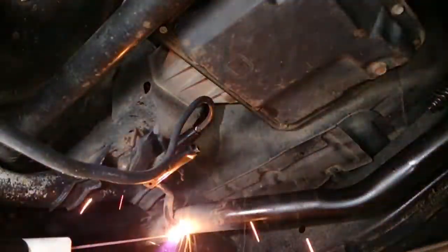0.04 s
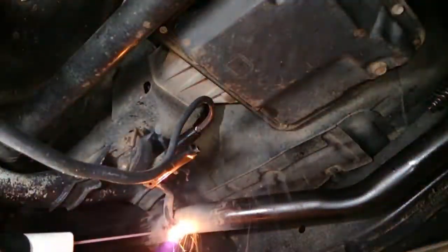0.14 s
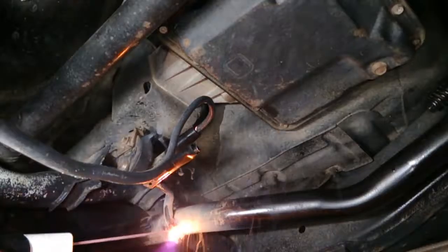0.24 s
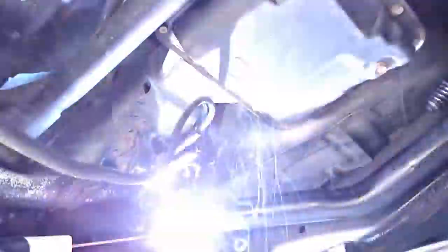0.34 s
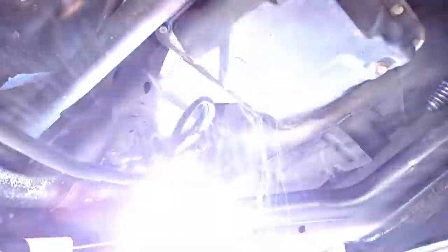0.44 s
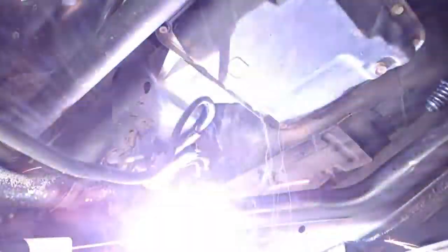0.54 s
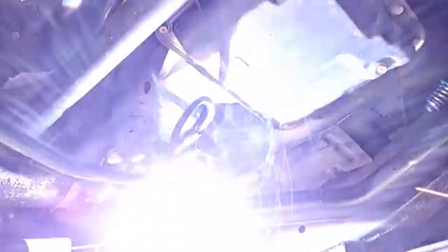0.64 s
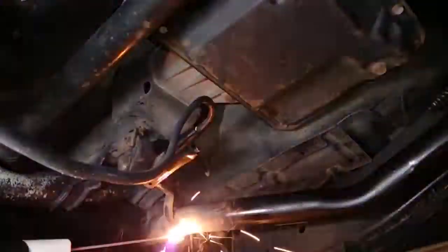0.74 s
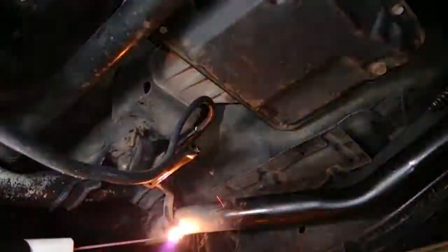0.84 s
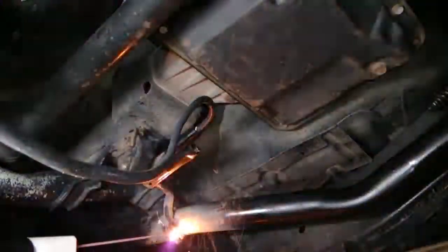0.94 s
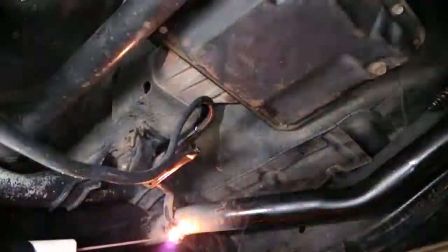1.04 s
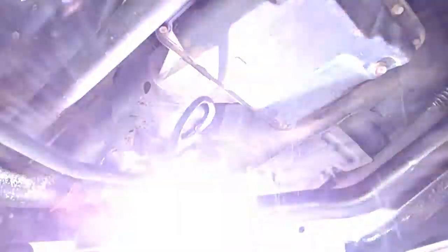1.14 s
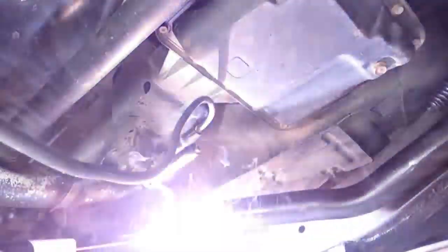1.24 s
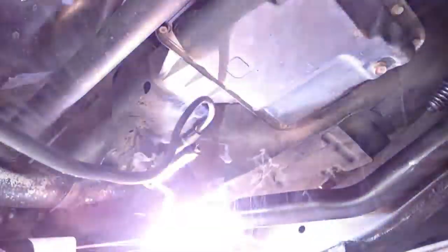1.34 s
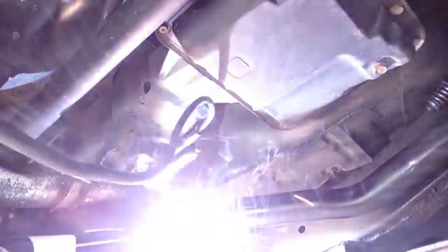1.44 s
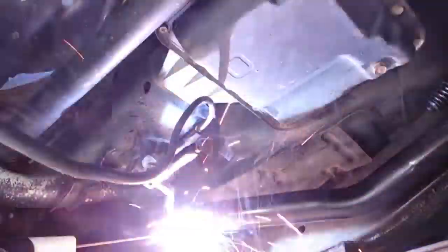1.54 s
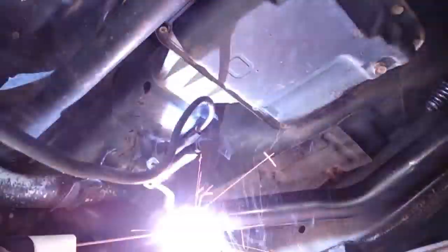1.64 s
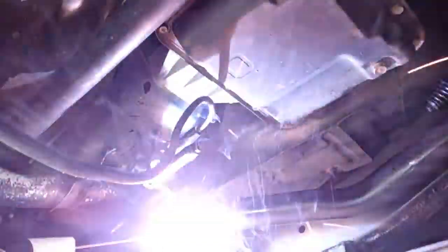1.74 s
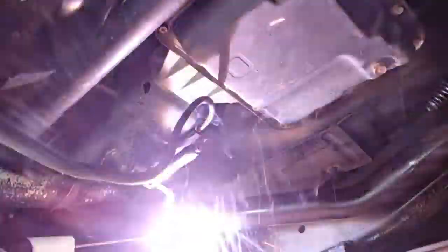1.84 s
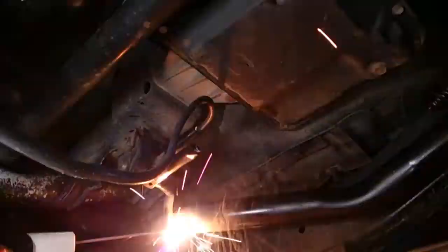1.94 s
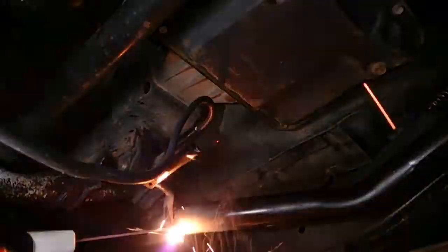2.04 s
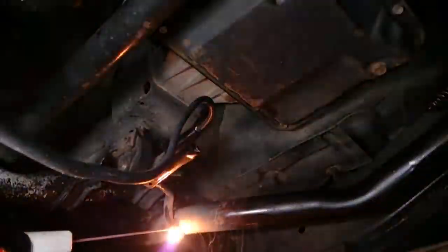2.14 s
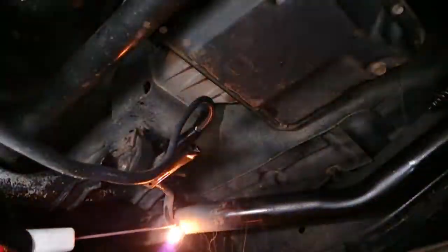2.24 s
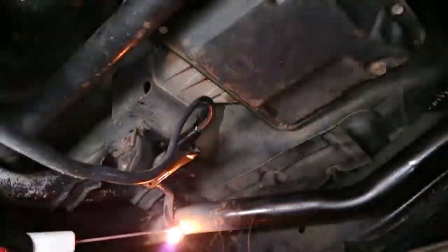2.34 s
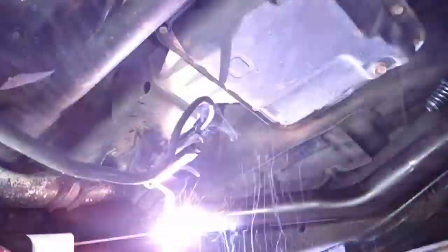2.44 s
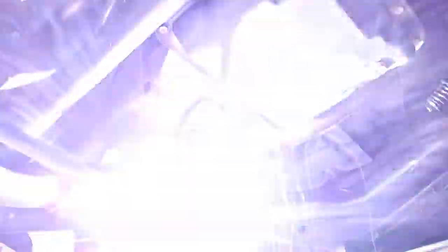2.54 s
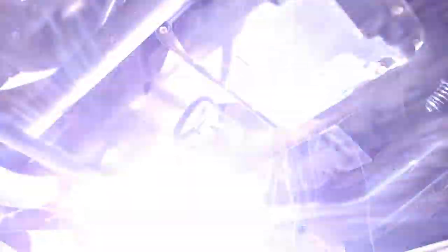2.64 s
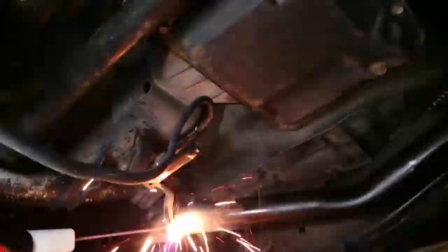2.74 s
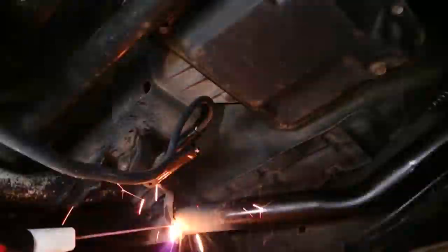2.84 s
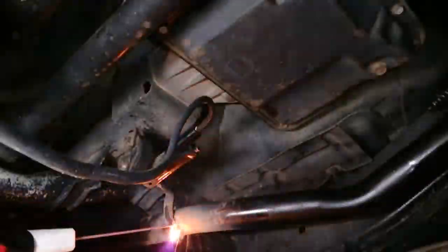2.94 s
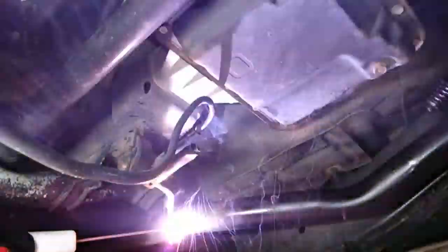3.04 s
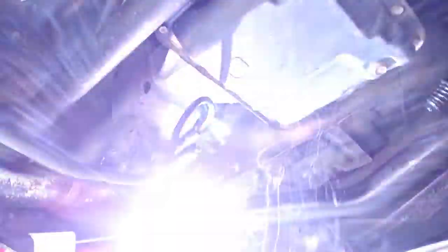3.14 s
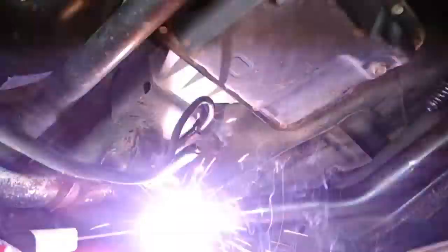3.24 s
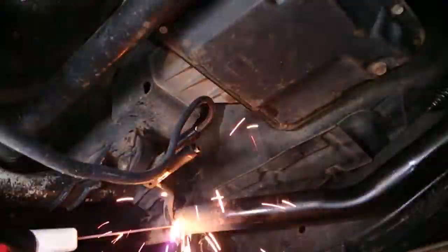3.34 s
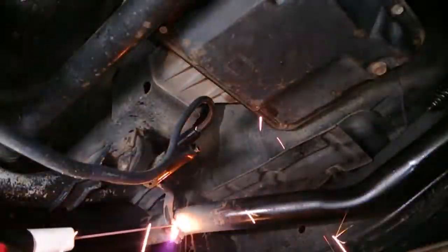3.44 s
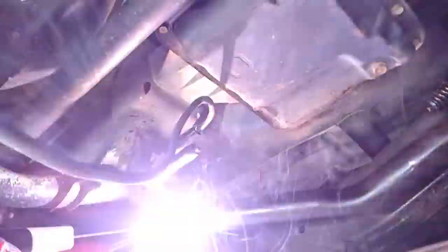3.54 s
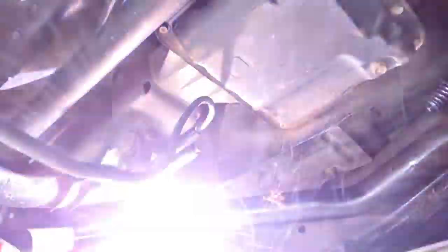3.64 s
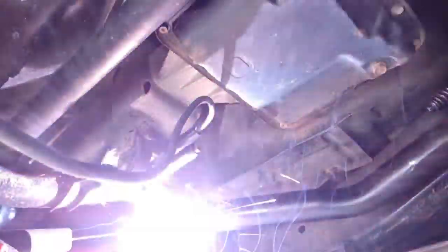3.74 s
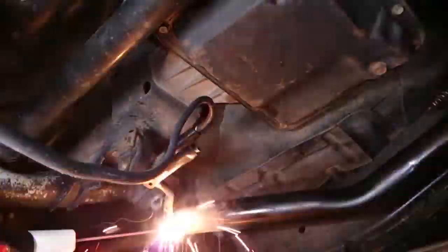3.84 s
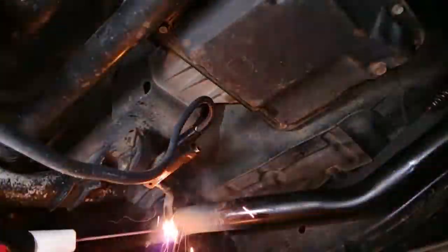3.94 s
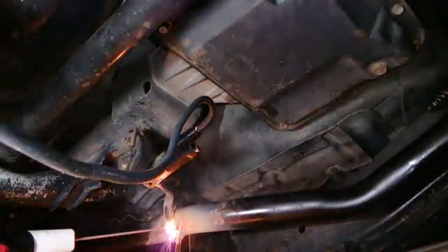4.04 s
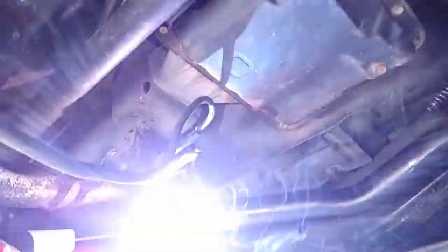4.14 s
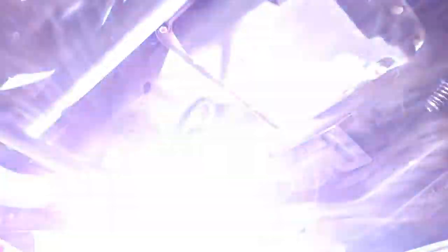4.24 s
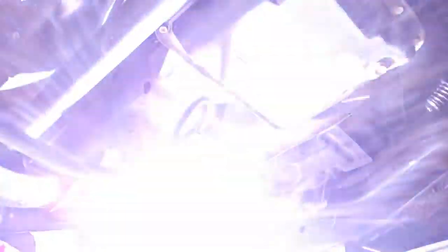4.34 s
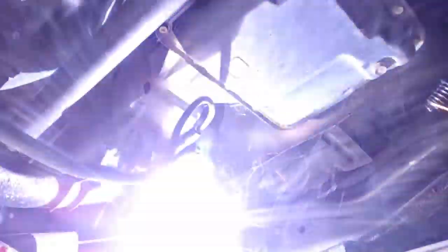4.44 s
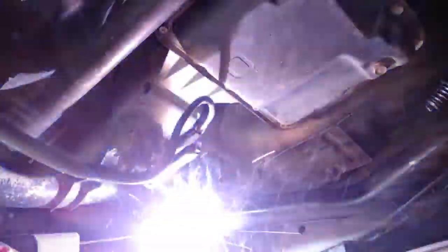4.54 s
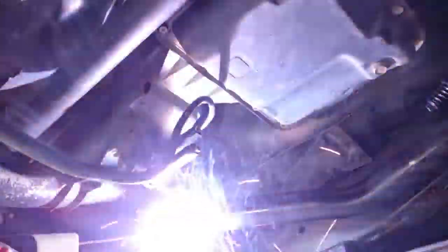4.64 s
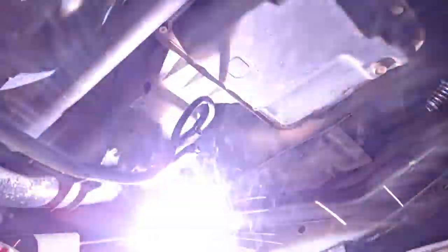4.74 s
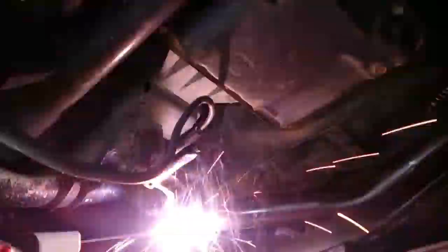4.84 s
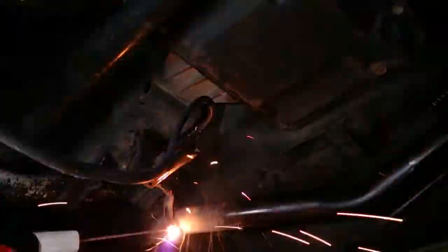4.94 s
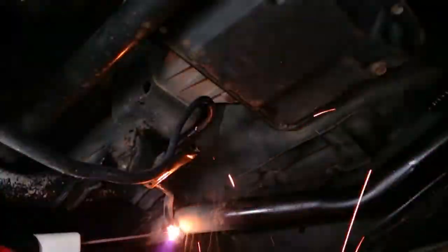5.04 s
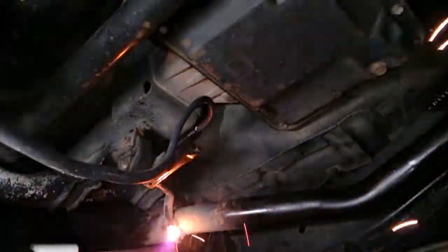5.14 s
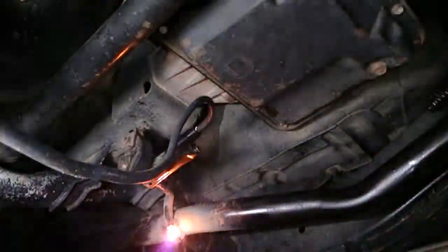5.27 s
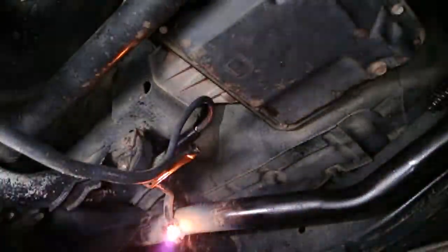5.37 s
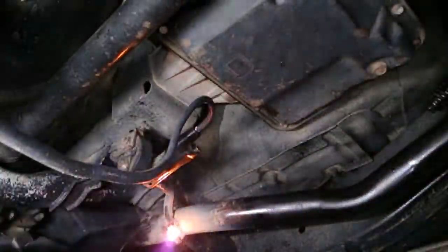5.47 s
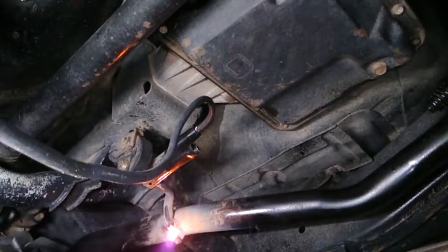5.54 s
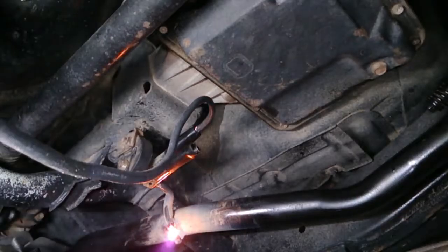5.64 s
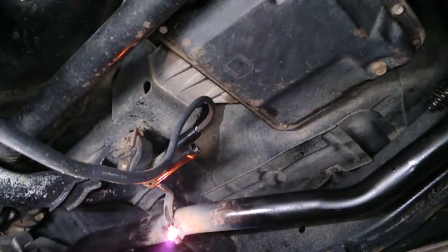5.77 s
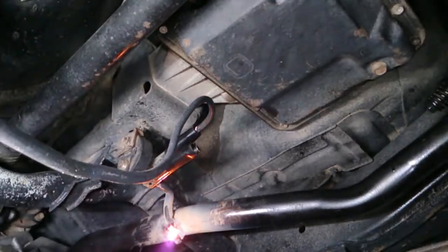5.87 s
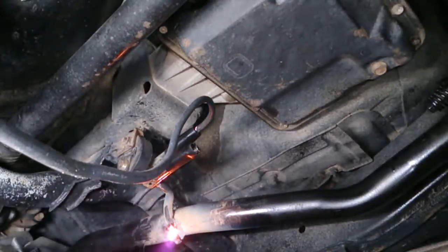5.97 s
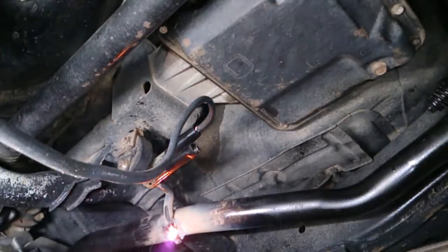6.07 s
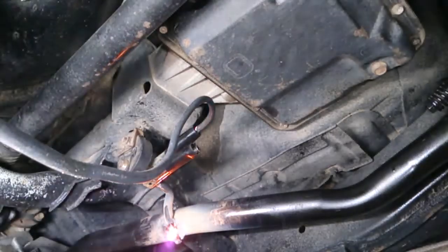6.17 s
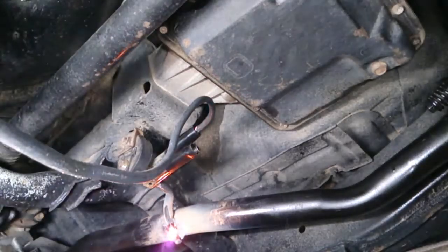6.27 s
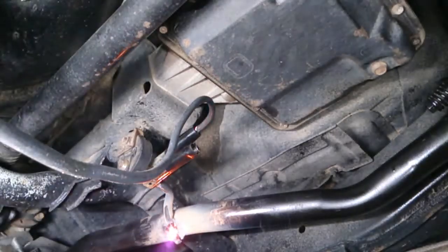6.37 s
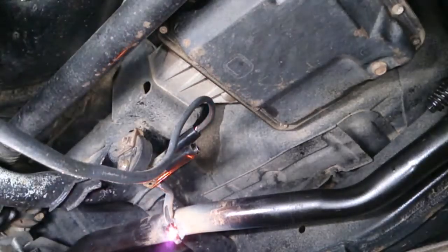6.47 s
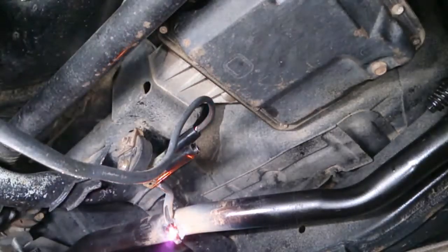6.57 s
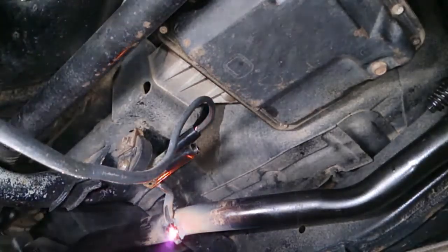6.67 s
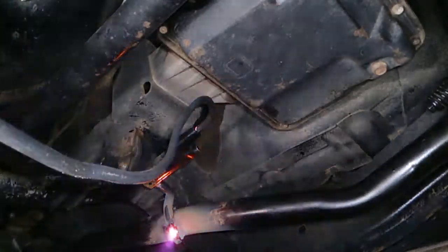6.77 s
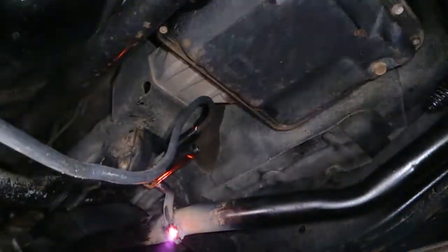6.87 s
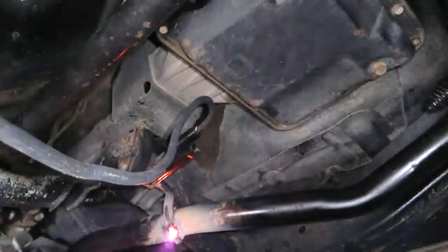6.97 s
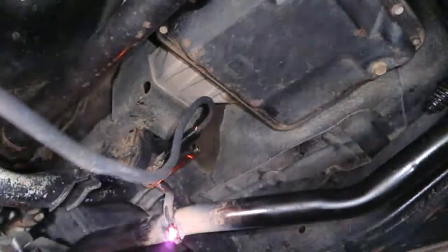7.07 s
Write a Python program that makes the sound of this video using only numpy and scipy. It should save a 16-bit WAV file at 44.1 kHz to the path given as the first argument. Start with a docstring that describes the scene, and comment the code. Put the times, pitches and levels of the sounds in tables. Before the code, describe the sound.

Sharp arc strikes spit and pop in ragged runs on an exhaust pipe, mains hum beneath, ending in quiet handling noises and fan hum.

```python
"""Under a car, a two-port microphone hears the welder's fan drone and a last scrap of arc as stick welding begins.
Six more short runs on the exhaust pipe follow: ticks strike the arc, sparks spit in step with the mains.
During each run the current hums, low sputter grows with it, and molten drops crack; pipe and underbody ring.
In the pauses the hot seam sizzles and ticks; after the last run the moved gear rustles, rubs and ticks.
Noise, clicks and sine tones make the sources; random paths with metal resonances carry the arc to the microphone."""
import sys
import numpy as np
from scipy import signal
from scipy.fft import rfft, irfft
from scipy.io import wavfile
from scipy.ndimage import uniform_filter1d

SR = 44100
rng = np.random.default_rng(int(sys.argv[2]) if len(sys.argv) > 2 else 0)


def log_audio(samples):
    """Write samples as a 16-bit WAV file to the path given in sys.argv[1]."""
    # one column per channel
    frames = np.atleast_2d(samples).T
    # limit to full scale, then quantise
    limited = np.clip(frames, -1, 1)
    pcm = np.round(limited * 32767).astype(np.int16)
    wavfile.write(sys.argv[1], SR, pcm)


N = 313551
T = np.arange(N) / SR  # seconds

# Steady tones of the welder's fan and transformer. Each row: frequency in Hz, relative level in dB.
FAN_TONES = [(81.7, -74), (99.9, -74.5), (178.3, -72.5), (199.8, -86), (284.6, -78), (531.7, -67),
             (631.6, -64), (731.5, -72)]
# Colour of the fan's rushing air. Each row: frequency in Hz, relative level in dB.
FAN_AIR = [(12, 3), (42, -9), (62, -2.5), (130, -22), (180, -1.5), (215, -10), (330, -16), (440, -1.5),
           (510, -12), (600, -9.5), (700, -15), (880, -12), (1200, -21), (2500, -32.5)]
# Likeness of diffuse sound at the two ports. Each row: frequency in Hz, likeness from 0 to 1.
PORT_LIKENESS = [(30, 0), (100, 0.38), (500, 0.92), (1100, 0.41), (2000, 0.33), (5000, 0), (15000, 0)]
# Sizzle of the hot seam, one curve for each pause. Each row: time in seconds, relative level in dB.
SIZZLE = [
    [(0.1, -63.5), (0.368, -68.5), (0.46, -64)],
    [(0.97, -65), (1.05, -77), (1.15, -66), (1.22, -66)],
    [(2.2, -61.5), (2.392, -67), (2.58, -69)],
    [(2.96, -67.5), (3.016, -58.5), (3.2, -66)],
    [(3.5, -66), (3.63, -69), (3.65, -69)],
    [(4.06, -62), (4.066, -59.5), (4.22, -61.5)],
]
# Colour of the sizzle and rustle. Each row: frequency in Hz, relative level in dB.
SIZZLE_COLOUR = [(590, -5), (1000, 0.5), (1380, 4.5), (1510, 4), (1820, 4), (2390, 0), (2840, -1.5),
                 (3780, 0), (4490, -0.5), (6950, 7), (7610, 4), (9470, 4), (12000, -2.5), (15500, -8)]
# Rustle as the gear is moved after the last run. Each row: time in seconds, relative level in dB.
RUSTLE = [(5.12, -67.5), (5.302, -62.5), (5.328, -70), (5.528, -64), (5.572, -67), (5.736, -57),
          (5.924, -64), (6.26, -59.5), (6.316, -75.5), (6.454, -63), (6.498, -73.5), (6.608, -62),
          (6.796, -59.5), (6.922, -67), (7.028, -60), (7.1, -71.5)]
# Soft rubs of the moved gear. Each row: start in seconds, length in seconds, centre in Hz, relative level in dB.
RUBS = [(5.21, 0.023, 6400, -53), (5.69, 0.12, 10000, -58), (5.758, 0.13, 5500, -58),
        (5.77, 0.16, 2070, -58), (6.224, 0.048, 6000, -52), (6.224, 0.042, 10200, -55),
        (6.72, .11, 9500, -66), (6.856, 0.29, 1210, -63)]
# Small ticks of the gear and the cooling seam. Each row: start in seconds, relative level in dB.
TICKS = [(0.184, -47), (2.324, -47), (2.3965, -41), (2.988, -42), (3.6505, -45), (4.142, -50),
         (5.1407, -51), (5.2145, -62), (5.372, -40.5), (5.4521, -44), (5.664, -49), (5.7249, -46),
         (6.1345, -53), (6.156, -41), (6.2447, -38), (6.7236, -48), (6.743, -42), (6.8015, -45),
         (6.888, -47), (7.0534, -50)]
# Low pushes of air from big bursts and handling. Each row: start in seconds, relative level in dB, pitch in Hz.
THUMPS = [(0.62, -37, 60), (0.637, -33, 42), (0.805, -30, 140), (2.101, -34, 190), (2.611, -30, 150),
          (2.868, -32, 170), (3.307, -37.5, 140), (4.669, -37, 260), (4.99, -39, 140), (6.214, -43, 40)]
# Metal ringing under a knock. Each row: start in seconds, resonance in Hz, relative starting level in dB.
PINGS = [(2.608, 1240, -32.5), (2.868, 1300, -41.5), (5.727, 3730, -53), (5.727, 8016, -49)]
# Partials of the arc's hum. Each row: multiple of the mains frequency, relative level in dB.
HUM_PARTIALS = [(1, -22), (2, -4.5), (3, -26.5), (4, -14.5), (6, -39)]
# Colour of a spark at the microphone. Each row: frequency in Hz, left and right relative level in dB.
SPARK_COLOUR = [(150, -23.5, -17), (296, -30, -28), (495, -23.5, -18.5), (803, -37, -29),
                (1326, -18, -15.5), (2420, -15.5, -15), (3800, -13, -13.5), (4050, -14, -15),
                (5200, -9.5, -10), (7170, -10, -7.5), (8420, -4.5, -2.5), (10000, -11, -9.5),
                (11640, -2.5, -8), (11900, -12.5, -17.5), (13250, -6.5, -8.5), (15200, -33.5, -25),
                (15440, -31.5, -20)]
# Resonances of the pipe, the underbody and the microphone ports.
# Each row: frequency in Hz, width in Hz, left and right relative lift in dB.
RESONANCES = [(529, 27, 9, 0.5), (748, 140, 4, 7), (922, 192, 14.5, 6.5), (1086, 44, -0.5, 10.5),
              (1316, 38, -8, 1.5), (1540, 49, -17, 7.5), (1846, 61, 1, -2.5), (2375, 460, 4, 7.5),
              (2784, 105, 4.5, 3), (2980, 490, 0.5, 5), (3080, 210, 0, 2), (3344, 50, 4, 12.5),
              (4480, 810, 5.5, 6), (5530, 86, -3.5, 11), (5960, 36, 9, 7), (6000, 55, 1, 6.5),
              (6086, 60, -7, 10), (6240, 170, -3, 2), (6370, 120, 2.5, 8.5), (6702, 84, -3, 10.0),
              (6842, 138, -10, 12), (7300, 110, -5, 8), (7700, 46, 8, 4), (9100, 56, -2.5, 0.5),
              (8770, 110, 11, 2.5), (9100, 55, 10.5, 12.5), (9670, 310, 11.5, -4), (10500, 46, 8.5, -3),
              (10650, 150, 11, 1)]
# Strikes of the rod and bursts of large molten drops.
# Each row: start in seconds, relative level in dB, relative weight of the low body in dB, decay in seconds.
POPS = [(0.487, -21.5, -4.5, .002), (0.4975, -18, -17, 0.0028), (.509, -18, -27, 0.00053),
        (0.561, -17.5, -18.5, 0.00088), (0.634, -5, -15, 0.0015), (.6385, -1.5, -18, 0.0024),
        (0.6696, -5, -16.5, 0.001), (0.6958, -9.5, -39, 0.001), (0.738, -4, -47, 0.0023),
        (0.8066, -19, -23, 0.002), (0.8167, -13, -25, 0.0025), (0.847, -22, -2.5, 0.0038),
        (1.2375, -42, 1.5, 0.00098), (1.246, -26, -10, 0.0042), (1.2567, -10, -13.5, 0.004),
        (1.27, -13, -17, 0.0039), (1.3595, -14, -25.5, 0.00073), (1.402, -13.5, -27, .002),
        (1.4589, -11.5, -11, 0.0022), (1.4874, -14.5, -21, 0.0022), (1.5271, -10.5, -26, 0.0025),
        (1.59, -21, -7, 0.0022), (1.621, -13, -22, 0.0024), (1.634, -19, -24, .002),
        (1.65, -13.5, -22, 0.0016), (1.688, -14, -16, 0.0024), (1.719, -13, -29, .002),
        (1.728, -6.5, -43, 0.0045), (1.749, -11, -15.5, 0.0047), (1.7875, -10, -34, 0.0038),
        (1.8477, -12.5, -17, 0.006), (1.8752, -10, -16, 0.0065), (1.909, -8, -40, 0.0018),
        (1.921, -9.5, -37, 0.0015), (1.9284, -9.5, -30, 0.0029), (2.0182, -21.5, -31, 0.0027),
        (2.068, -31, -15, .002), (2.0779, -18, -7, 0.0028), (2.598, -29.5, -4.5, 0.0055),
        (2.6077, -17.5, -4.5, 0.0057), (2.649, -8.5, -23, 0.0017), (2.6554, -13, -21, 0.0026),
        (2.7086, -15, -19, .002), (2.868, -30, 4.5, 0.0036), (3.2182, -30.5, -5, 0.0032),
        (3.237, -18, -31, 0.0018), (3.259, -10.5, -23, 0.0037), (3.3077, -11, -45.5, 0.0023),
        (3.3104, -3.5, -28, .0012), (3.3583, -9, -44, 0.0047), (3.4104, -19.5, -22, 0.0013),
        (3.668, -52, 7, .003), (3.6765, -36, -3, 0.0018), (3.6799, -14.5, -12, 0.0024),
        (3.691, -17, -3, 0.0013), (3.752, -13, -31, 0.0012), (3.8185, -16, -34, 0.0016),
        (3.83, -20, -7, 0.0018), (3.8396, -13, -28, 0.0024), (3.8794, -27, -7, 0.0011),
        (3.9207, -12.5, -26, 0.0018), (3.9696, -24.5, -6, 0.0024), (4.2395, -33, -9, 0.0027),
        (4.25, -24, -20, 0.0024), (4.26, -20.5, -13, .002), (4.2714, -19, -5.5, 0.00095),
        (4.35, -16.5, -7, 0.0025), (4.411, -18, -9.5, 0.0027), (4.471, -12.5, -27, .0015),
        (4.711, -13.5, -29, 0.0037), (4.751, -12, -46, 0.0013), (4.8127, -14.5, -38, 0.0017),
        (4.9204, -23.5, -1.5, .002), (5.032, -34, -19, .002)]
# Runs of the arc, one curve each, from strike to break.
# Each row: time in seconds, relative crackle level in dB, relative level of the current's hum in dB.
RUNS = sorted( [ [(0.0, -41.5, -50.5), (0.026, -51, -64), (0.04, -43, -69)], ] + [ [(0.49, -39, -59),
        (0.5, -24.5, -48.5), (0.606, -27.5, -48), (0.646, -19.5, -44.5), (0.798, -33, -46),
        (0.852, -23, -42.5), (0.86, -38, -54)], [(2.607, -34.5, -40), (2.657, -16.5, -62),
        (2.679, -25.5, -44), (2.791, -29.5, -50.5), (2.821, -26.5, -46), (2.853, -34, -52),
        (2.88, -56, -43.5)], [(3.229, -31, -46), (3.241, -23.5, -61), (3.303, -27, -43),
        (3.309, -20.5, -45.5), (3.383, -28.5, -50), (3.399, -52, -47.5), (3.415, -47, -51)],
        [(3.68, -34, -43), (3.704, -27, -37), (3.72, -31.5, -37.5), (3.848, -28.5, -52), (3.876, -31, -44),
        (3.93, -28.5, -78), (3.98, -58, -49.5)], ] + [ [(1.238, -53, -42), (1.253, -40, -37.5),
        (1.257, -24, -40), (1.342, -26.5, -41.5), (1.558, -28.5, -46), (1.618, -24.5, -45.5),
        (1.716, -35.5, -46), (1.752, -27, -46), (1.766, -37, -39.5), (1.84, -27.5, -50),
        (1.928, -27.5, -47.5), (1.996, -54, -51), (2.036, -34.5, -58), (2.088, -41, -41),
        (2.105, -45, -37)], [(4.26, -46, -49), (4.276, -29.5, -45), (4.41, -29, -43), (4.465, -35, -43),
        (4.49, -26, -45.5), (4.534, -28.5, -44), (4.654, -27, -46.5), (4.678, -34, -42), (4.76, -30, -59),
        (4.808, -40, -47), (4.822, -27.5, -63), (4.866, -37.5, -43.5), (4.898, -30, -51),
        (4.954, -34.5, -38.5), (5.035, -76, -45)], ])
# Tone of each run, in order. Each row: low sputter in relative dB, top octave in relative dB at the strike.
RUN_TONE = [(6.5, -8), (4.5, 0), (3, 1.5), (5.5, -2), (3, -4), (6, 5), (4, 1.5)]

MAINS_HZ = 49.963
HISS_REF_DB, MIDDLE_SHARE = -61.5, 0.67  # away from this level the hiss's middle moves less than its treble
FIRST_CRACK_DB = -8.5  # first crack of a burst against the cluster behind it
SPUTTER_SHARE = 0.7  # how far the low sputter follows the current rather than the crackle
TOP_FALL_DB_PER_S = 13  # fall of the crackle's top octave during each run
EDGE_HZ = 15700  # upper band limit


def amp(db):
    """Decibels to gain."""
    return 10 ** (np.asarray(db) / 20)


def unit(x):
    """Scales to rms 1."""
    return x / np.sqrt(np.mean(x ** 2) + 1e-20)


def read(points, hz, axis=1):
    """One column of a spectrum table, joined on a log-frequency axis."""
    table = np.transpose(points)
    return np.interp(np.log(hz + 1), np.log(table[0] + 1), table[axis])


def follow(tables, axis):
    """Gain curve of one dB column, silent outside its tables."""
    gain = 0
    for rows in tables:
        columns = np.transpose(rows)
        gain = gain + np.interp(T, columns[0], amp(columns[axis]), left=0, right=0)
    return gain


def add(mix, s, sound):
    """Lays a sound into the mix at s seconds."""
    part = mix[max(round(s * SR), 0):][:len(sound)]
    part += sound[:len(part)]


def band(x, hz, kind, order=2):
    """Low-pass, high-pass or band-pass."""
    return signal.sosfilt(signal.butter(order, hz, kind, fs=SR, output="sos"), x)


def slow_noise(hz):
    """Random wavering slower than hz, rms 1."""
    return unit(band(rng.standard_normal(N), hz, "low"))


def noise_pair(size):
    """Spectra of diffuse noise at the two ports: most alike near 500 Hz, unrelated in the high treble."""
    a, b = rfft(rng.standard_normal((2, size)))
    hz = np.fft.rfftfreq(size, 1 / SR)
    same = np.clip(read(PORT_LIKENESS, hz), 0, 1)
    return hz, np.array([a, same * a + np.sqrt(1 - same ** 2) * b])


def balance(left_db, right_db):
    """Gains of the left and right port."""
    return amp([[left_db], [right_db]])


def from_right(x, left_db, right_db):
    """A source on the right reaches the left port later and weaker."""
    later_left = np.roll(x[0], 14)  # samples
    return np.array([amp(left_db) * later_left, amp(right_db) * x[1]])


def ringing_db(hz):
    """Lift of the resonances in each channel, a bell around each frequency."""
    lift = 0
    for f, width, left, right in RESONANCES:
        lift = lift + np.array([[left], [right]]) / (1 + (2 * (hz - f) / width) ** 2)
    return lift


def spark_path(near_db, shop_db, near_t60, shop_t60=0.18, ring_share=0.99):
    """Response from one spot of the seam to the microphone: direct sound, close metal panels, the workshop."""
    size = 2 ** 14
    t = np.arange(size) / SR
    path = np.zeros((2, size))
    path[0, 0] = path[1, 3] = 1  # direct sound, three samples later at the right port
    for db, t60 in ((near_db, near_t60), (shop_db, shop_t60)):
        hz, z = noise_pair(size)
        path += amp(db) * unit(irfft(z) * amp(-60 * t / t60)) / np.sqrt(size)
    path = rfft(path)
    # the reflections smear each spark in time and leave its broad colour unchanged
    power = uniform_filter1d(uniform_filter1d(abs(path) ** 2, size=36), size=36)
    smear_db = 10 * np.log10(power)
    spark_db = np.array([read(SPARK_COLOUR, hz, axis=1), read(SPARK_COLOUR, hz, axis=2)])
    colour_db = spark_db + ring_share * ringing_db(hz)
    log_gain = np.log(amp(colour_db - smear_db))
    # minimum phase: the colouring rings only after the spark
    mirrored = np.hstack([log_gain, log_gain[:, -2:0:-1]])
    causal = np.exp(signal.hilbert(mirrored).conj())[:, :len(hz)]
    response = band(irfft(path * causal), 220, "high")
    return response / np.linalg.norm(response.mean(0))


def underbody(x, near_db, shop_db, near_t60, count=3, size=441):
    """The source hops between spots of the weld pool in steps of size samples, each with its own reflections."""
    spot = rng.integers(0, count, N)[np.arange(N) // size]
    out = 0
    for k in range(count):
        path = spark_path(near_db, shop_db, near_t60)
        out = out + signal.oaconvolve((x * (spot == k))[None], path, axes=1)[:, :N]
    return out


def grains(per_s, spread_db):
    """Single clicks at random moments, a few much larger than the rest; rms 1."""
    sizes = amp(spread_db * np.minimum(rng.exponential(1, N), 3)) * rng.choice([-1, 1], N)
    return unit(sizes * (rng.random(N) < per_s / SR))


def burst(decay, size=1500):
    """A sharp first crack and a tight cluster of smaller ones that dies within milliseconds; energy 1."""
    fade = np.exp(-np.arange(size) / SR / decay)
    cracks = rng.standard_normal(size) * rng.exponential(1, size) * fade
    cracks = cracks / np.linalg.norm(cracks)
    cracks[0] = amp(FIRST_CRACK_DB)
    return cracks / np.linalg.norm(cracks)


def with_body(x, body, body_db=15.5, split_hz=1500):
    """Weights the low part of a crackle: heavy drops sputter, light ones fizz."""
    low = band(band(x, split_hz, "low", order=1), split_hz, "low", order=1)
    high = band(band(x, split_hz, "high", order=1), split_hz, "high", order=1)
    return amp(body_db) * body * low - high  # opposite sign keeps the two in step at the split


def tinted(x, patch_db=3.0, size=256, time_count=4, band_count=6):
    """Bands of the crackle swell and sink at random, in patches a few frames long and a few bins wide."""
    z = signal.stft(x, nperseg=size)[2]
    patches = uniform_filter1d(rng.standard_normal(z.shape), size=band_count, axis=0)
    patches = unit(uniform_filter1d(patches, size=time_count, axis=1))
    return signal.istft(z * amp(patch_db * patches), nperseg=size)[1][:N]


def microphone_hiss(db=-75.0):
    """Even self-noise of the two ports."""
    return amp(db) * rng.standard_normal((2, N))


def fan(air_db=-58.5, tones_db=0.3, waver=0.09, left_db=-3.5, right_db=2):
    """The welder's fan on the right: rushing air and gently wavering tones."""
    hz, z = noise_pair(N)
    air = amp(air_db) * unit(irfft(z * amp(read(FAN_AIR, hz)), N))
    tones = 0
    for f, db in FAN_TONES:
        tone = np.sin(2 * np.pi * (f * T + rng.random()))
        tones = tones + amp(db) * tone * (1 + waver * slow_noise(11.0))
    return from_right(air + amp(tones_db) * np.sqrt(2) * tones, left_db, right_db)


def hiss_level_db():
    """Level of sizzle, then rustle, joined straight across the runs."""
    return np.interp(T, *np.vstack(SIZZLE + [RUSTLE]).T)


def sizzle(treble_db=0, seam_middle_db=-6, gear_middle_db=-2.5, grain_db=1.5, ring_share=0.59,
           direct_share=0.075, left_db=-3, right_db=2):
    """Fine, grainy hiss of the hot seam and the handled gear; it brightens as it swells."""
    hz, z = noise_pair(N)
    z = direct_share * z[0] + (1 - direct_share) * z  # a small share is common to both ports
    hiss = irfft(z * amp(read(SIZZLE_COLOUR, hz) + ring_share * ringing_db(hz)), N)
    hiss = hiss / hiss.std(1, keepdims=True) * amp(grain_db * slow_noise(260))
    level_db = hiss_level_db()
    middle_db = HISS_REF_DB + MIDDLE_SHARE * (level_db - HISS_REF_DB)
    middle_db = middle_db + np.where(T < RUSTLE[0][0], seam_middle_db, gear_middle_db)
    out = 0
    for kind, db in (("high", level_db + treble_db), ("low", middle_db)):
        out = out + amp(db) * np.sqrt(2) * unit(band(hiss, 4000, kind, order=3))
    return from_right(out, left_db, right_db)


def crinkle(ticks_per_s=45, spread_db=6.0, level_db=-8):
    """Tiny ticks of the cooling slag and the handled gear, rising and falling with their hiss."""
    tiny = band(grains(ticks_per_s, spread_db), 8000, "low", order=1)
    return amp(level_db + hiss_level_db()) * tiny


def ticks(level_db=15, decay=0.00092, bright_hz=7500):
    """Small, sharp ticks between the runs, each a very short burst."""
    out = np.zeros(N)
    for s, db in TICKS:
        add(out, s, amp(db + level_db) * burst(decay))
    return band(out, bright_hz, "low", order=1)


def rubs(spread=1.25, left_db=-2, right_db=2):
    """Swells of friction noise, each around one resonance."""
    out = 0
    for s, length, hz, db in RUBS:
        swell = np.sin(np.pi * np.clip((T - s) / length, 0, 1))
        friction = band(rng.standard_normal((2, N)), [hz / spread, hz * spread], "band")
        out = out + amp(db) * swell * unit(friction)
    return out * balance(left_db, right_db)


def thump(damping=1.8, left_db=-2, right_db=2):
    """Each push swings the air once or twice."""
    out = np.zeros(N)
    for s, db, hz in THUMPS:
        cycles = hz * T[:SR // 8]
        add(out, s, amp(db) * np.sin(2 * np.pi * cycles) * np.exp(-damping * cycles))
    return out * balance(left_db, right_db)


def pings(t60=0.16, width_share=0.046, left_db=-2, right_db=2):
    """A knock sets one resonance of the metal ringing briefly: narrow noise that dies away."""
    out = np.zeros((2, N))
    t = T[:SR // 4]
    for s, hz, db in PINGS:
        edges_hz = [hz * (1 - width_share), hz * (1 + width_share)]
        ring = unit(band(rng.standard_normal((2, len(t))), edges_hz, "band"))
        for channel, sound in zip(out, ring * amp(db - 60 * t / t60)):
            add(channel, s, sound)
    return out * balance(left_db, right_db)


def hum(level_db=3, left_db=-5.5, right_db=2, fall_db_per_s=220, waver=0.11,
        rumble_db=-11.5, rumble_hz=250, lump_db=3.5):
    """The welding current shakes the transformer; the workshop holds the hum a moment after the arc breaks."""
    fall_db = fall_db_per_s * T
    load_db = 20 * np.log10(follow(RUNS, axis=2) + 1e-6)
    held_db = np.maximum.accumulate(load_db + fall_db) - fall_db  # rises at once, falls at a set rate
    load = band(amp(held_db), 69.5, "low")
    phase = 2 * np.pi * MAINS_HZ * T - np.pi / 8
    tones = 0
    for k, db in HUM_PARTIALS:
        tones = tones + amp(db) * np.cos(round(k) * phase) * (1 + waver * slow_noise(21))
    rumble = band(irfft(noise_pair(N)[1], N), rumble_hz, "low", order=6)
    rumble = unit(band(rumble, 34, "high", order=1))
    rumble = unit(rumble * amp(lump_db * slow_noise(30)))  # the arc puffs unevenly
    return amp(level_db) * balance(left_db, right_db) * load * (np.sqrt(2) * tones + amp(rumble_db) * rumble)


def spatter(snaps_per_s=110, spread_db=2.0, level_db=-11.0, body_db=-22):
    """Beads of metal snap off the burning arc, one by one."""
    snaps = grains(snaps_per_s, spread_db) * follow(RUNS, axis=1)
    return amp(level_db) * with_body(snaps, amp(body_db))


def pops(level_db=11, flare_db=-9, flare_decay=0.007, body_db=6, sheen_db=0):
    """Strikes and bursting drops, each with a bright crack and a short flare of the arc."""
    out = np.zeros(N)
    for s, db, weight_db, decay in POPS:
        pop = burst(decay) + amp(flare_db) * burst(flare_decay)
        add(out, s, amp(db + level_db) * with_body(pop, amp(weight_db + body_db)))
    return band(out, 12500, "low", order=3) + amp(sheen_db) * band(out, 14000, "high", order=3)


def arc_tone():
    """Gains of the low sputter, which grows with the current, and of the top octave, which falls during each run."""
    strikes = np.array([run[0][0] for run in RUNS])
    run = np.maximum(np.searchsorted(strikes, T, "right") - 1, 0)
    sputter_db, top_db = np.array(RUN_TONE)[run].T
    current_over_crackle = (follow(RUNS, axis=2) + 1e-9) / (follow(RUNS, axis=1) + 1e-9)
    sputter = amp(sputter_db) * current_over_crackle ** SPUTTER_SHARE
    return sputter, amp(top_db - TOP_FALL_DB_PER_S * (T - strikes[run]))


def arc(sparks_per_s=3500, spread_db=3.0, cycle_db=0.65, fizz_db=-7, level_db=-1.56):
    """Sparks of very unequal size, strongest once in each half wave of the mains."""
    half_waves = 2 * MAINS_HZ * T + .15
    throb_db = 7 * np.cos(2 * np.pi * half_waves)
    sparks = grains(sparks_per_s, spread_db) + amp(fizz_db) * rng.standard_normal(N)
    # no two half waves burn alike
    vigour_db = cycle_db * rng.standard_normal(N)[np.round(half_waves).astype(int)]
    # bands of the crackle swell and sink at random, in short patches and then longer, narrower ones
    sparks = tinted(sparks, patch_db=2.5)
    sparks = tinted(sparks, patch_db=2.0, size=512, time_count=6, band_count=3)
    sparks = sparks * amp(throb_db + vigour_db)
    sparks = sparks / np.sqrt(uniform_filter1d(sparks ** 2, size=1764))  # even level over 40 ms
    # the top octave has its own gain
    sputter, top = arc_tone()
    sparks = band(sparks, 10150, "low", order=3) + top * band(sparks, 9400, "high", order=3)
    return amp(level_db) * with_body(sparks * follow(RUNS, axis=1), sputter)


def scene():
    """The arc and its bursting drops, each with their own reflections under the car, over the quiet workshop."""
    background = fan() + microphone_hiss()
    small_ticks = underbody(ticks() + crinkle(), near_db=8, shop_db=-3.5, near_t60=0.038, count=2)
    gear = small_ticks + sizzle() + rubs()
    snaps = underbody(spatter(), near_db=2.0, shop_db=-9.5, near_t60=0.036, count=1)
    cracks = underbody(pops(), near_db=2.5, shop_db=-5.5, near_t60=0.05, count=2)
    crackle = underbody(arc(), near_db=2.0, shop_db=-7.0, near_t60=0.066)
    return background + gear + thump() + pings() + hum() + snaps + cracks + crackle


def record(dry):
    """The loudest cracks flatten softly towards a ceiling; then the band limit."""
    ceiling = .75  # of full scale
    limited = dry / (1 + (dry / ceiling) ** 4) ** (1 / 4)
    lowpass = signal.firwin(301, EDGE_HZ, window=("kaiser", 8), fs=SR)
    return signal.oaconvolve(limited, lowpass[None], "same")


dry = scene()
out = record(dry)
log_audio(out)
```